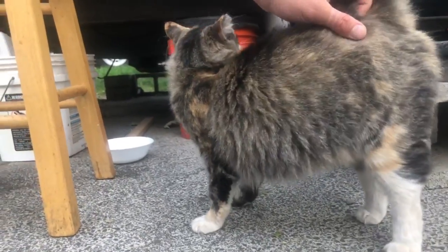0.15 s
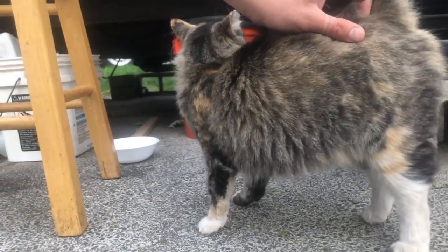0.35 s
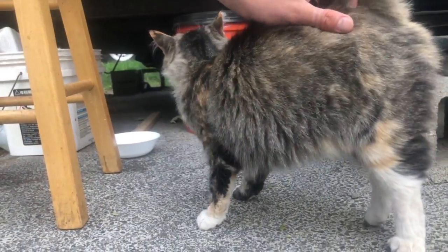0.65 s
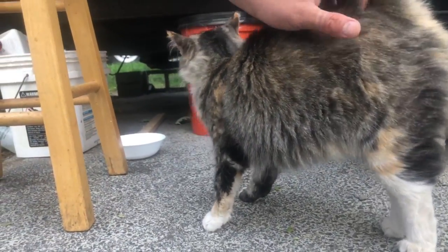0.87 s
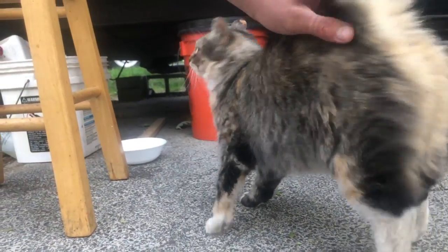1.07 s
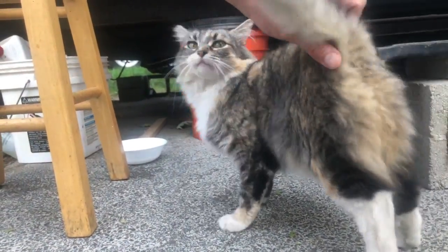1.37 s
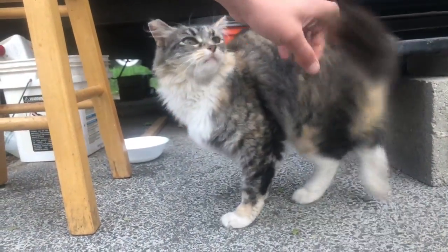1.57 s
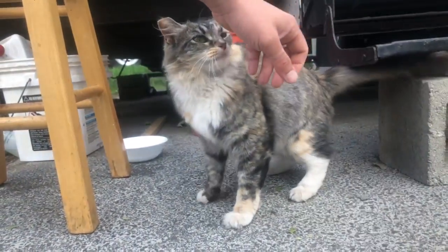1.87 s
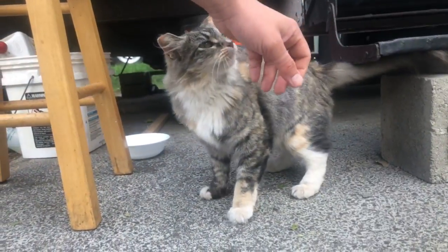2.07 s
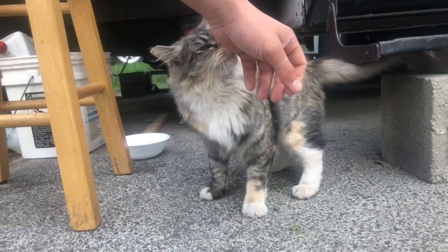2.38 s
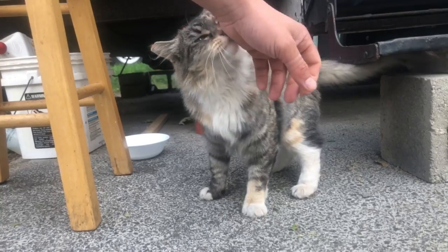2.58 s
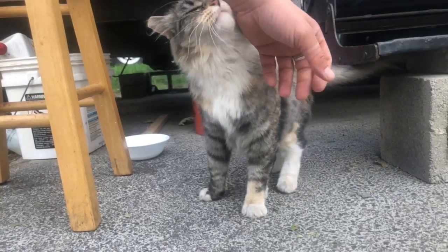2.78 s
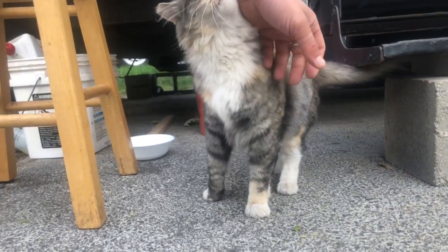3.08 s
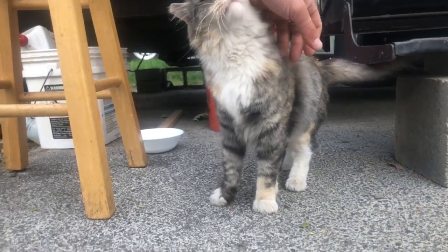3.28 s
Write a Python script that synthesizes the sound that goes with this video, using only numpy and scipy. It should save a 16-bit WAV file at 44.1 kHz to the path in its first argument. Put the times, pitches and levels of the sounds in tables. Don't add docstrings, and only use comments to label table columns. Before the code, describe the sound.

Faint breathy cat trill, quick fluttering puffs opening slightly at the end, then sparse paw and claw taps; behind it, a receding engine hum, tyre roar and thin hiss, picked up by a phone outdoors.

```python
import sys
import numpy as np
from scipy import signal
from scipy.fft import rfft, irfft, next_fast_len
from scipy.io import wavfile
from scipy.ndimage import uniform_filter1d, map_coordinates

SR = 44100
rng = np.random.default_rng(int(sys.argv[2]) if len(sys.argv) > 2 else 0)


def store_pcm(level_fs):
    pcm = np.round(np.clip(level_fs, -1, 1) * 32767).astype(np.int16)
    wavfile.write(sys.argv[1], SR, np.atleast_2d(pcm).T)


def invert_db(x):
    u = np.asarray(x, float) / 20
    return 10 ** u


N = 151704

# f/Hz, density/dB per Hz
TYRE_SPECTRUM = [(240, -20), (400, -15.5), (489, -15), (573, -9), (754, -2.5), (1000, -4.5), (1680, -11.5),
                 (3840, -31), (5000, -40.5), (6500, -53), (11000, -120)]
CAR_SPECTRUM = [(200, -36), (330, -2), (480, -3.5), (600, -5.5), (800, -0.5), (1100, -4), (1600, -15.5),
                (2600, -45)]
EXHAUST_SPECTRUM = [(200, -37), (300, -5), (400, 0), (520, 0), (650, -18.5), (900, -45)]
RUMBLE_SPECTRUM = [(20, -38), (35, -12.5), (70, 0.5), (130, -3.5), (250, -2.5), (380, -8.5), (550, -20.5),
                   (900, -42)]
HISS_SPECTRUM = [(2500, 2.5), (3500, -1.5), (4800, -3), (7200, -1.5), (9000, -3), (12500, -6),
                 (15000, -5.5), (17200, -1.5)]
# t/s, level/dB
CAR_LEVEL = [(0, -73), (1.5, -58), (2.2, -57), (2.5, -48), (2.85, -47.5), (3.1, -48.5), (3.44, -46)]
TYRES_DB, RUMBLE_DB = -50.5, -49.5
EXHAUST_DB, EXHAUST_DB_PER_S = -56, -6
HISS_DB, HISS_DB_PER_S = -67.5, 0.35

# t/s, f/Hz
SHAFT = [(0, 24.2), (.25, 24.0), (.55, 23.73), (1.0, 23.45), (1.5, 23.27), (2.1, 23.07), (2.5, 22.91),
         (3.44, 22.86)]
ORDER_LEVELS = {2: (-73, -0.5), 5: (-48, -6.5), 6: (-51, -4), 7: (-74, 5), 10: (-65, 1.5), 13: (-62, -3),
                19: (-59, -5.5), 21: (-60, -4.5)}
# t/s, order 3 level/dB, order 8 level/dB
LOW_ORDERS = [(0, -51, -50.5), (.3, -51.5, -56.5), (.6, -52.5, -52.5), (.93, -53, -48), (1.25, -50.5, -52),
              (1.6, -55.5, -53.5), (1.95, -56, -51), (2.3, -58, -56), (2.8, -55.5, -53.5),
              (3.44, -57.5, -61)]
# t/s, order 11 level/dB, order 16 level/dB
PIPE_ORDERS = [(.1, -48, -60), (.27, -49, -61), (.37, -63, -63), (.5, -46, -63), (.95, -49, -63),
               (1.14, -62, -58), (1.3, -43, -59), (1.45, -45, -60), (1.53, -53, -61), (1.62, -45, -64),
               (2.07, -45, -61), (2.25, -57, -58), (2.46, -43, -56), (2.62, -46, -64), (2.85, -46, -50),
               (3.02, -47, -58), (3.1, -58, -65), (3.3, -48, -66)]
FLICKER_DB, WANDER_RAD = 2.5, 0.4

# t/s, peak level/dB, centre f/Hz, t60/s
TICKS = [(.74, -56, 16000, .04), (1.515, -35.5, 420, 0.023), (1.518, -46, 2800, 0.027),
         (1.499, -56, 3300, 0.02), (2.18, -54, 8000, 0.022), (2.745, -55, 4400, .04),
         (2.887, -57.5, 9900, .04), (3.179, -44.5, 11000, .02), (3.18, -44, 16000, .012),
         (3.184, -56, 8500, .08), (3.286, -42, 900, 0.018), (3.316, -56, 6600, .02), (2.995, -42, 77, 0.33),
         (1.235, -53, 6000, .03), (3.221, -50, 14000, .015)]
# t/s, peak level/dB, f/Hz, width/Hz
CLAW_TAPS = [
    (3.2215, -41, 2900, 1700),
    (1.5445, -45, 4500, 2800),
]
# t/s, length/s, level/dB
STROKES = [
    (1.225, .035, -70),
    (1.52, .05, -72),
    (1.67, .14, -72),
    (2.99, .03, -76),
    (3.2, .04, -69),
]
# f/Hz, density/dB per Hz
FUR_SPECTRUM = [(2500, -30), (5500, 7), (8000, 0), (17000, -7)]

# t/s, effort level/dB, mouth opening/0-1
TRILL = [(1.08, -69, 0), (1.16, -62, 0), (1.34, -60, 0), (1.41, -63, .3), (1.46, -62, .8), (1.507, -58, .4),
         (1.58, -61, .8), (1.72, -58, 1), (1.83, -65, 1)]
# t/s, level/dB, f/Hz that the sinking throat passes at the puff's peak
PUFFS = [(1.098, -70, 3940), (1.129, -63, 3910), (1.161, -61, 3950), (1.2, -62, 3700), (1.237, -57, 3850),
         (1.272, -58, 3750), (1.303, -56, 3720), (1.325, -62, 3800), (1.338, -53, 3720), (1.36, -63, 3800),
         (1.372, -59, 3660), (1.406, -63, 3800), (1.44, -61, 3800), (1.476, -64, 3300), (1.507, -55, 3710),
         (1.53, -60, 3800), (1.544, -60, 3800), (1.564, -62, 3590), (1.578, -64, 3350), (1.6, -62, 3700),
         (1.612, -59, 3150), (1.646, -59, 3750), (1.666, -62, 3800), (1.68, -59, 3400), (1.702, -61, 3800),
         (1.712, -57, 3250), (1.734, -58, 3200), (1.746, -52, 3300), (1.779, -59, 3150), (1.804, -58, 3200)]
# f/Hz, width/Hz, level/dB mouth shut, level/dB mouth open
THROAT = [(4800, 1600, -17, -11), (6250, 800, -15, -11), (6800, 800, -16, -9)]
RISE_S, FALL_S = .004, .0025
LEAK_DB, LEAK_OPEN_DB = -16, 7
THROAT_WIDTH_HZ, OPEN_WIDENS, REST_HZ = 480, .8, 3750
SINK_HZ_PER_S, WHISTLE = 45000, .72

TIME = np.arange(N) / SR


def unit(x):
    return x / np.sqrt(np.mean(x ** 2) + 1e-20)


def curves(rows):
    s, *columns = np.transpose(rows)
    return [np.interp(TIME, s, column) for column in columns]


def wobble(rate):
    return map_coordinates(rng.standard_normal(200), [np.arange(N) * np.clip(rate, .1, 50) / SR])


def filtered(x, response):
    m = next_fast_len(len(x) + 8192)
    return irfft(rfft(x, m) * response(np.fft.rfftfreq(m, 1 / SR)), m)[:len(x)]


def resonance(centre, width):
    return lambda f: 1j * f * width / (centre * centre - f * f + 1j * f * width)


def resonant_noise(centre, width, length=N):
    ring = resonance(centre, width)
    return unit(filtered(rng.standard_normal(length), lambda f: ring(f) ** 2))


def resonant_click(centre, width, length):
    ring = resonance(centre, width)
    impulse = np.zeros(length)
    impulse[0] = 1
    click = filtered(impulse, lambda f: ring(f) ** 2)
    return click / abs(click).max()


def rush(spectrum, patchy_db):
    z = signal.stft(rng.standard_normal(N), nperseg=512)[2]
    field = uniform_filter1d(rng.standard_normal(z.shape), size=6, axis=0)
    field = uniform_filter1d(field, size=14, axis=1)
    x = signal.istft(z * invert_db(patchy_db * unit(field)), nperseg=512)[1][:N]
    f, db = np.transpose(spectrum)
    log_f = np.log(f + 1)
    return unit(filtered(x, lambda hz: invert_db(np.interp(np.log(hz + 1), log_f, db, left=-120, right=-120))))


def background():
    road = invert_db(TYRES_DB + 0.057 * wobble(2.77)) * rush(TYRE_SPECTRUM, patchy_db=0.6)
    car = invert_db(curves(CAR_LEVEL)[0] + wobble(5.87)) * rush(CAR_SPECTRUM, patchy_db=0.5)
    exhaust = invert_db(EXHAUST_DB + EXHAUST_DB_PER_S * TIME) * rush(EXHAUST_SPECTRUM, patchy_db=1.8)
    rumble = invert_db(RUMBLE_DB + 0.2 * wobble(2.9)) * rush(RUMBLE_SPECTRUM, patchy_db=0.5)
    hiss_db = HISS_DB + HISS_DB_PER_S * TIME + 0.26 * wobble(4.48)
    hiss = invert_db(hiss_db) * rush(HISS_SPECTRUM, patchy_db=1.0)
    return road + car + exhaust + rumble + hiss


def engine():
    turn = 2 * np.pi * np.cumsum(curves(SHAFT)[0]) / SR
    levels = {}
    for order, (db, slope) in ORDER_LEVELS.items():
        levels[order] = db + slope * TIME + FLICKER_DB * wobble(4.03)
    levels[11], levels[16] = curves(PIPE_ORDERS)
    levels[3], levels[8] = curves(LOW_ORDERS)
    out = np.zeros(N)
    for order, db in levels.items():
        phase = order * turn + 2 * np.pi * rng.random() + WANDER_RAD * wobble(5.44)
        out += np.sqrt(2) * invert_db(db) * np.sin(phase)
    return out


def ticks():
    out = np.zeros(N + SR)
    t = np.arange(SR // 4) / SR
    for s, db, hz, t60 in TICKS:
        snap = resonant_click(hz, 0.47 * hz, len(t))
        grain = resonant_noise(hz, 0.47 * hz, len(t))
        onset = 1 - np.exp(-t / 0.00067)
        decay = invert_db(db - 3.5 - 60 * t / t60)
        out[round(s * SR):][:len(t)] += invert_db(db - 4) * snap + decay * onset * grain
    for s, db, hz, width in CLAW_TAPS:
        out[round(s * SR):][:len(t)] += invert_db(db) * resonant_click(hz, width, len(t))
    return out[:N]


def fur_strokes():
    swell = np.zeros(N)
    for s, length, db in STROKES:
        swell += invert_db(db) * np.exp(-.5 * ((TIME - s) / (length / 2)) ** 2)
    return swell * invert_db(wobble(44.8)) * rush(FUR_SPECTRUM, patchy_db=1)


def throat_air(turn, width):
    def slow():
        return unit(filtered(rng.standard_normal(N), lambda f: 1 / (1 + (2 * f / width) ** 2)))
    return slow() * np.cos(turn) + slow() * np.sin(turn)


def trill():
    effort_db, mouth = curves(TRILL)
    at, puff_db, puff_hz = np.transpose(PUFFS)
    near = np.searchsorted((at[1:] + at[:-1]) / 2, TIME)
    late = TIME - at[near]
    puff = np.exp(-.5 * (late / np.where(late < 0, RISE_S, FALL_S)) ** 2)
    sounding = (TIME > TRILL[0][0]) * (TIME < TRILL[-1][0])
    leak = invert_db(LEAK_DB + LEAK_OPEN_DB * mouth) * sounding

    sinking_hz = puff_hz[near] - SINK_HZ_PER_S * np.clip(late, -.006, .006)
    turn = 2 * np.pi * np.cumsum(sinking_hz) / SR
    shut_air = throat_air(turn, THROAT_WIDTH_HZ)
    open_air = throat_air(turn, THROAT_WIDTH_HZ * (1 + OPEN_WIDENS))
    breath = (1 - mouth) * shut_air + mouth * open_air
    whistle = np.sqrt(2) * np.sin(turn)
    voice = invert_db(puff_db[near] - 1) * puff * (WHISTLE * whistle + (1 - WHISTLE) * breath)

    upper = np.zeros(N)
    for centre, width, shut_db, open_db in THROAT:
        gain = (1 - mouth) * invert_db(shut_db) + mouth * invert_db(open_db)
        upper += gain * resonant_noise(centre, width)
    rest = resonant_noise(REST_HZ, THROAT_WIDTH_HZ)
    return voice + invert_db(effort_db) * ((puff + leak) * upper + leak * rest)


def scene():
    return (background() + engine() + ticks() + fur_strokes() + trill())[None]


def roll_off(x):
    return signal.sosfilt(signal.butter(12, 18080, fs=SR, output="sos"), x)


def record(dry):
    mix = filtered(dry[0], lambda hz: hz < 17230)[None]
    return roll_off(mix)


dry = scene()
out = record(dry)
store_pcm(out)
```